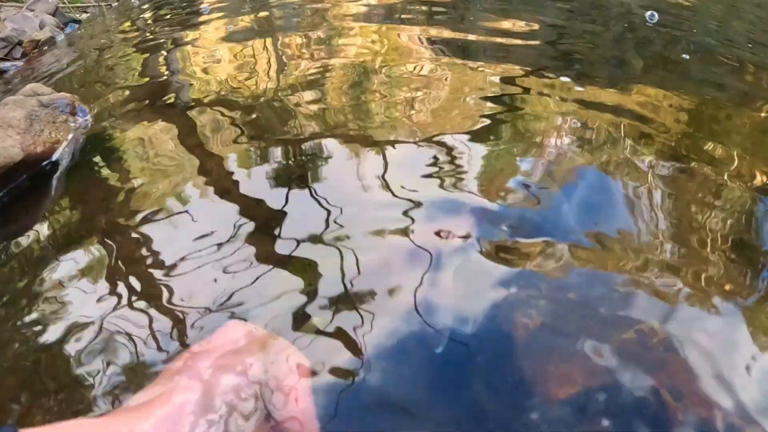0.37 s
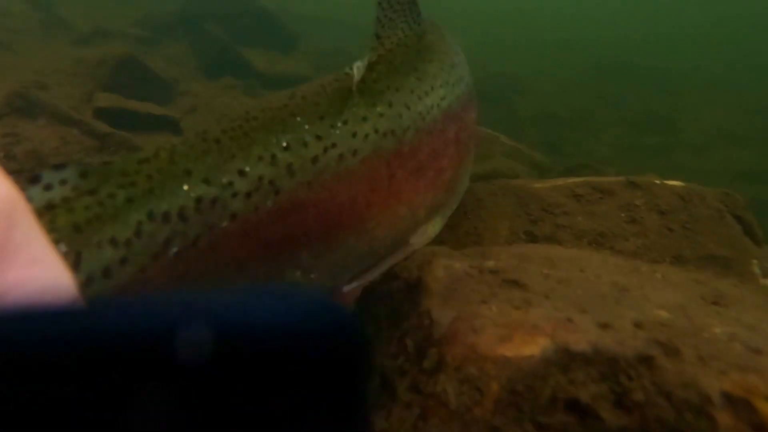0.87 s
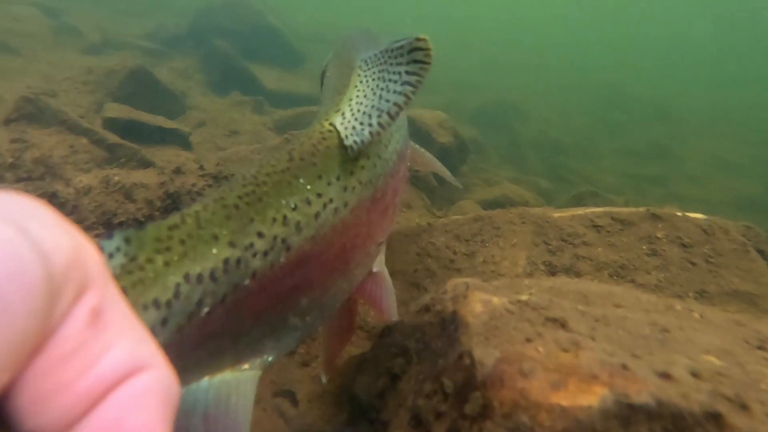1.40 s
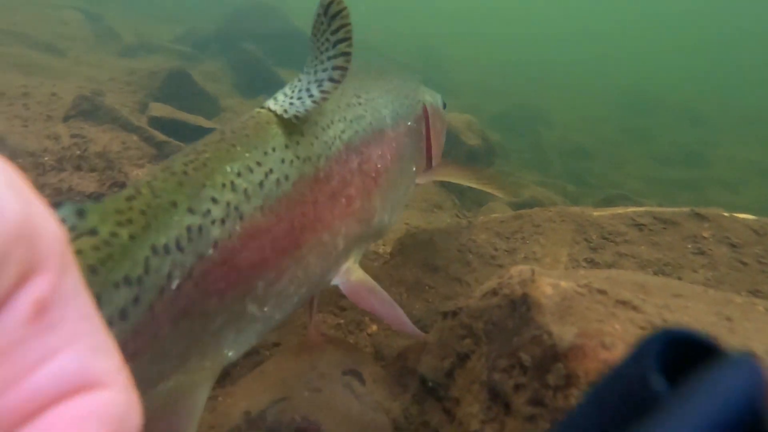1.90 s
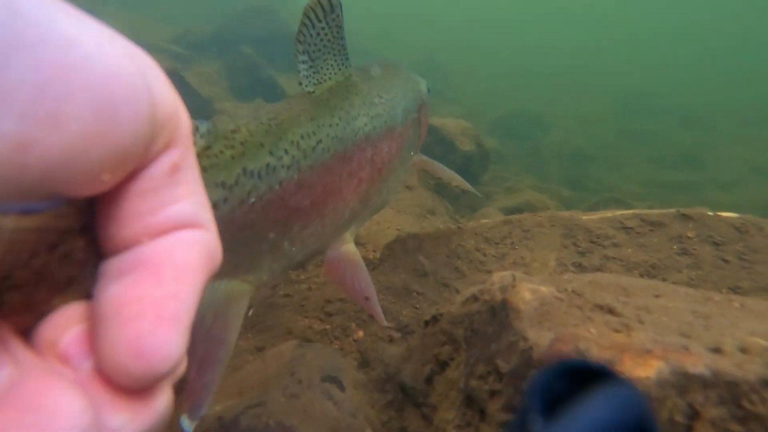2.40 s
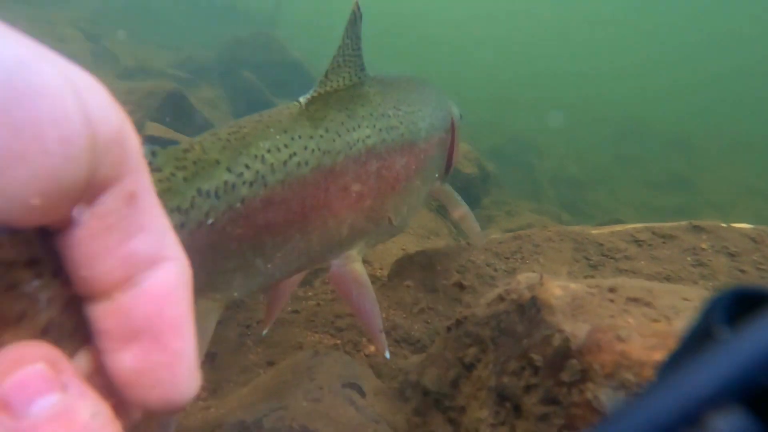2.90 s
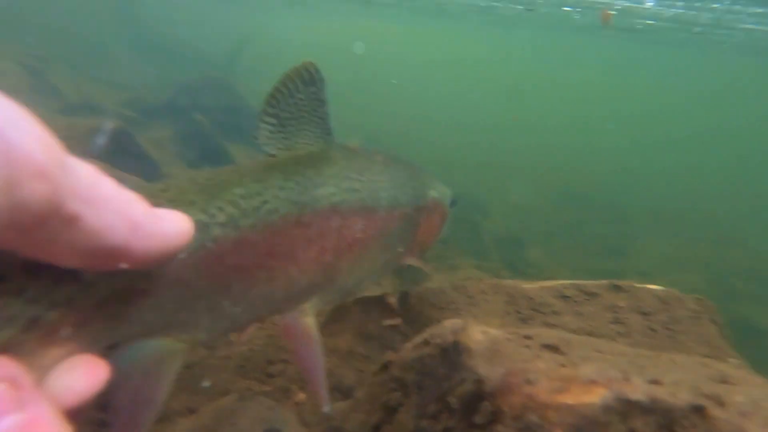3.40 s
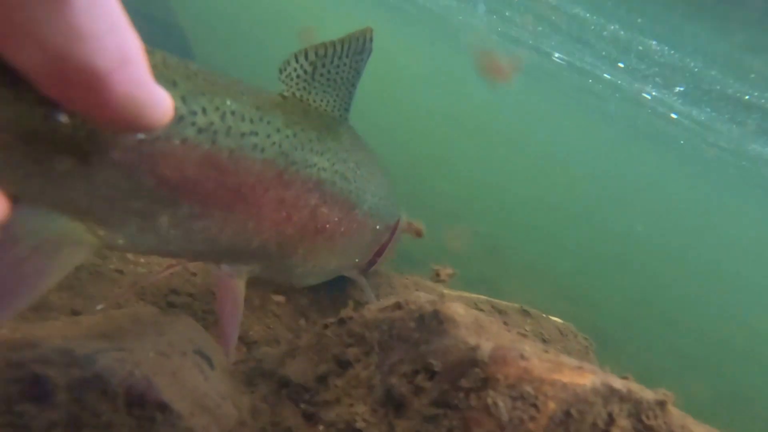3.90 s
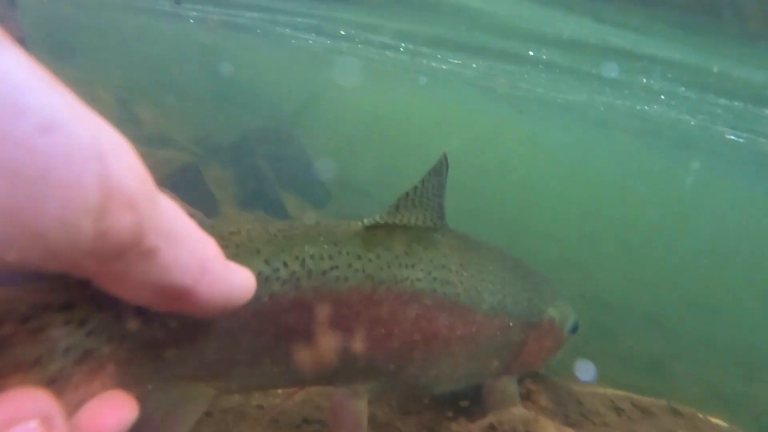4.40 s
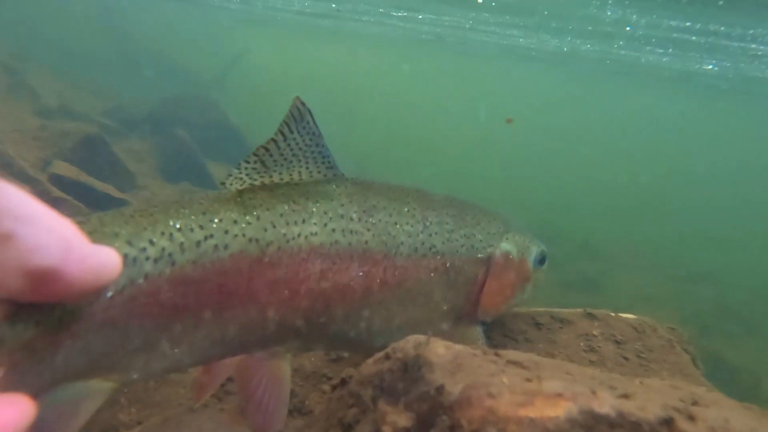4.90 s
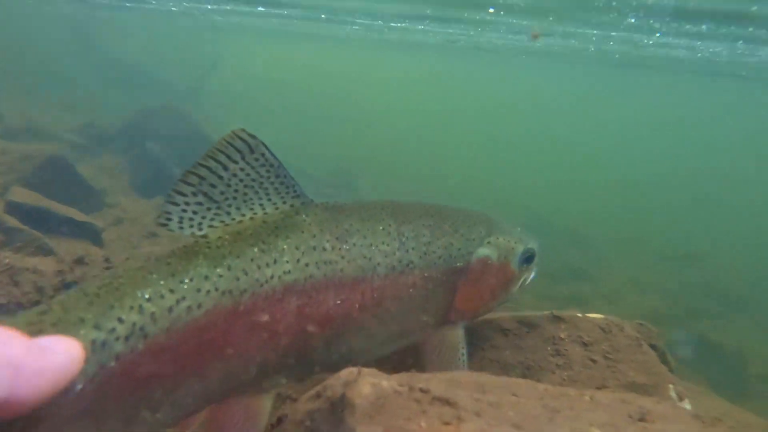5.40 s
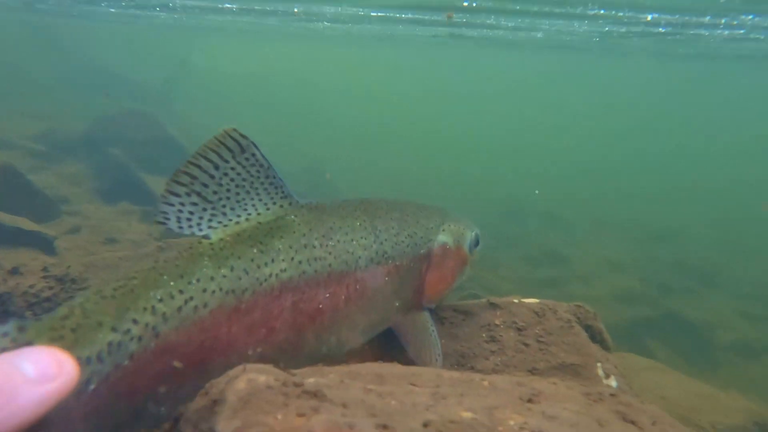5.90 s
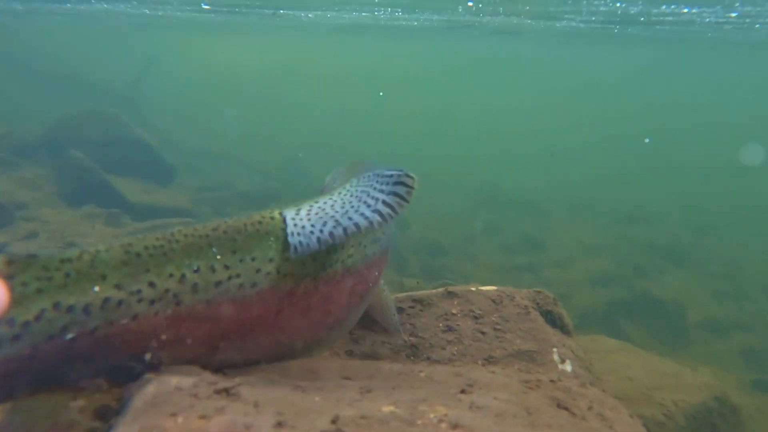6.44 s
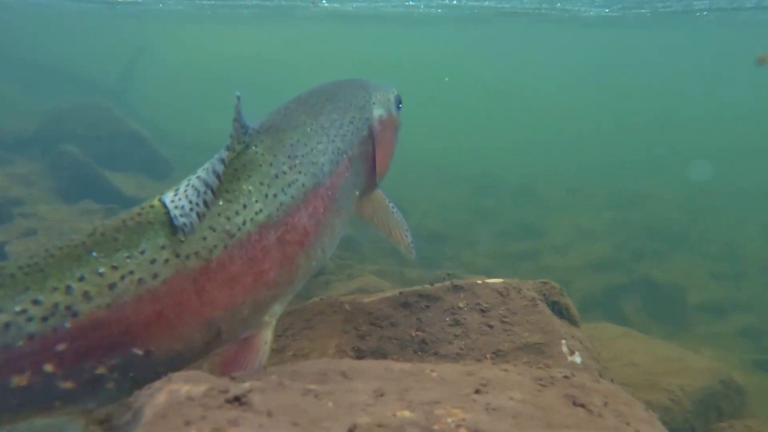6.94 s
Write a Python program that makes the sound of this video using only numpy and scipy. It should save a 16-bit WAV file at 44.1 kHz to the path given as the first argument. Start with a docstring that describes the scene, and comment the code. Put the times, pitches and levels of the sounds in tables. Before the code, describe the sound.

A small microphone dips from a chirping, splashy stream into dull underwater rumble, with gurgling bubbles, then fingers rubbing and knocking its housing.

```python
"""At a stream, a small camera held over the water is pushed under: the bright babble, a noise wash with chirping
bubbles, is cut off. Air pops out of the microphone ports as short dying sines, with slaps of noise and a gurgle.
A muffled rush remains: low noise with the rumble of the current and a resonance of the shell. Fingers rub, scrape
and knock the housing, as noise bursts and struck modes, and pushes thump the diaphragm. The ports hiss faintly.
Soon after the dive the camera folds its two ports into one channel."""
import sys
import numpy as np
from scipy import signal
from scipy.fft import rfft, irfft
from scipy.io import wavfile
from scipy.ndimage import uniform_filter1d

SR = 44100
rng = np.random.default_rng(int(sys.argv[2]) if len(sys.argv) > 2 else 0)


def put_to_file(sound):
    """Save the sound as 16-bit audio at rate SR, in the file named by the first command-line argument."""
    columns = np.atleast_2d(sound).T  # one column per channel
    safe = np.clip(columns, -1, 1)
    whole_steps = np.round(safe * 32767)
    wavfile.write(sys.argv[1], SR, whole_steps.astype(np.int16))


def voltage_ratio(level):
    """Linear amplitude factor for a level in decibels (scalar or array-like)."""
    return 10 ** (np.asarray(level, float) / 20)


N = 311076

DIVE_S = .838  # the ports go under
DIVE_LEAN_DB = -13  # left against right: sounds of the dive are louder at the right port

# ringing modes of the housing: pitch_hz, level_db, t60_s
HOUSING = [(484, 0, .06), (612, -5, .04), (1082, -3, .05), (1448, -20, .05), (1735, -15, .035),
           (2250, -33, .025), (3100, -38, .06), (3610, -36, .035), (4280, -52, .025), (4600, -52, .025)]
# loudness of the muffled rush, with dips and slow swells: time_s, level_db
RUSH_LEVEL = [(.84, -20.5), (.92, -35), (.96, -22), (1.02, -53.5), (1.07, -42.5), (1.12, -43),
              (1.19, -37.5), (1.23, -65), (1.34, -40), (1.5, -41), (1.85, -42.5), (2.06, -36), (2.2, -32.5),
              (2.28, -36.5), (2.48, -33.5), (2.72, -34), (3.05, -29), (3.6, -27), (4.2, -49), (4.4, -21.5),
              (4.53, -50), (4.65, -36.5), (5.08, -36.5), (5.7, -27), (5.9, -27.5), (6.1, -25.5),
              (7.05, -23.5)]
# force of current and grip on the housing, as rumble: time_s, level_db
PUSH_LEVEL = [(.84, -23), (.92, -46.5), (.96, -27), (1.0, -31), (1.19, -22.5), (1.27, -39.5), (1.34, -32.5),
              (1.7, -46), (1.87, -57), (2.03, -30), (2.79, -27), (3.3, -24.5), (3.53, -25.5), (3.58, -30.5),
              (3.85, -15.5), (4.2, -15.5), (4.45, -18.5), (4.54, -30), (4.63, -19.5), (4.92, -28.5),
              (5.0, -25), (5.95, -32.5), (6.03, -23.5), (6.1, -33.5), (6.45, -25), (7.05, -27)]


def amp_of(points, at):
    """Reads (x, dB) rows as a gain."""
    return voltage_ratio(np.interp(at, *np.transpose(points)))


def log_read(points, hz):
    """Reads (Hz, value) rows on a log axis."""
    f, value = np.transpose(points)
    return np.interp(np.log(hz + 1), np.log(f + 1), value)


def evened(x):
    """Scales to rms 1."""
    return x / np.sqrt(np.mean(x ** 2) + 1e-20)


def add(mix, s, sound, pan_db):
    """Lays a sound into both channels; pan_db = left against right."""
    part = mix[:, round(s * SR):][:, :len(sound)]
    part += voltage_ratio(np.array([[pan_db / 2], [-pan_db / 2]])) * sound[:part.shape[1]]


def noise(spectrum, size, patchy_db, flicker_db, tilt_db=0, count=N):
    """Random short-time spectra with drifting patches and a flicker shared by all bands; tilt in dB per octave."""
    hz, frames = np.fft.rfftfreq(size, 1 / SR), 4 * count // size + 5
    a, b, patches = rng.standard_normal((frames, len(hz), 3)).T
    patches = uniform_filter1d(patches, size=size // 128, axis=0)  # smooth along frequency
    patches = evened(uniform_filter1d(patches, size=8, axis=1))  # smooth along time
    flicker = evened(uniform_filter1d(rng.standard_normal(frames), size=4))
    field_db = (log_read(spectrum, hz) + tilt_db * np.log2(hz / 1000 + 0.00085))[:, None]
    z = (a + 1j * b) * voltage_ratio(field_db + patchy_db * patches + flicker_db * flicker)
    return evened(signal.istft(z, nperseg=size, noverlap=3 * size // 4)[1][:count])


def ring(hz, t60, glide=0, rise=4):
    """A dying sine at the pitch hz * (1 + 2 * glide * t); rise = how fast it starts, per cycle."""
    t = np.arange(4000) / SR
    onset = (1 - np.exp(-t * hz * rise)) ** 2
    return np.sin(2 * np.pi * hz * (t + glide * t ** 2)) * voltage_ratio(-60 * t / t60) * onset


def babble(t):
    """Dense wash plus small bubbles that chirp upward; the treble leans left; cut off as the ports go under."""
    # stream heard in air: pitch_hz, density_db (per Hz)
    air_spectrum = [(15, -58), (25, -19), (96, 1.5), (183, 2), (215, 6), (314, -4.5), (583, 4.5), (649, -2),
                    (921, -0.5), (1240, -6), (1340, -6.5), (7520, -29.5), (15600, -50)]
    # what differs between the ports: pitch_hz, density_db (per Hz)
    apart_spectrum = [(24, -41), (40, -3.5), (66, -4), (120, -24.5), (325, -4), (654, -9), (1000, -1.5),
                      (1770, -10), (7540, -22), (15600, -41.5)]
    # share of the sound that leans left: pitch_hz, share
    left_lean = [(1500, 0), (4400, .06), (8000, .17), (14000, .5)]
    level_db, apart_db = -26, -11.5  # apart_db is against the shared part
    count = SR
    mid = noise(air_spectrum, size=1024, patchy_db=1.0, flicker_db=1.5, count=count)
    for hz in np.geomspace(400, 9000, num=24):
        starts = rng.random(count) < 25 / SR  # 25 bubbles per second at each pitch
        sizes = voltage_ratio(4.3 * rng.exponential(1, count)) * starts
        bubbles = signal.oaconvolve(sizes, ring(hz, 12 / hz, glide=hz / 40))[:count]
        mid += voltage_ratio(-14.5 + log_read(air_spectrum, hz) * 0.41) * bubbles
    mid = evened(mid)
    hz = np.fft.rfftfreq(count, 1 / SR)
    apart = noise(apart_spectrum, size=1024, patchy_db=-0.1, flicker_db=0.0, count=count)
    side = irfft(voltage_ratio(apart_db) * rfft(apart) + log_read(left_lean, hz) * rfft(mid), count)
    pair = np.zeros((2, N))
    pair[:, :count] = mid + np.array([[1], [-1]]) * side
    return pair * voltage_ratio(level_db) * np.clip((DIVE_S - t) / 0.0015, 0, 1)


def under_water(mid, apart, t):
    """Spreads a sound over the submerged ports, stronger at the right one, from the dive on."""
    side = 0.89 * apart - 0.35 * mid
    return np.array([mid + side, mid - side]) * np.clip((t - DIVE_S) / 0.00075, 0, 1)


def muffled_rush(t):
    """The stream through water and housing: low noise with separate grain at each port."""
    # stream heard through water and housing: pitch_hz, density_db (per Hz)
    rush_spectrum = [(53, -48), (90, -8.5), (150, -7.5), (185, -7.5), (283, 0), (357, -17), (426, -3),
                     (600, 0), (710, 0), (765, -12.5), (941, -11.5), (1070, -20.5), (1190, -19.5),
                     (1670, -36.5), (2270, -60), (3000, -66), (3900, -100), (6600, -120)]
    gain = amp_of(RUSH_LEVEL, t)
    mid, apart = [gain * noise(rush_spectrum, size=1024, patchy_db=.9, flicker_db=1.5) for _ in range(2)]
    return under_water(mid, apart, t)


def rumble(t):
    """Current and grip push the housing: lumpy low noise, nearly the same at both ports."""
    # current and grip pushing the housing: pitch_hz, density_db (per Hz)
    rumble_spectrum = [(8.8, -25), (15, 9.5), (51, -5), (123, -18.5), (162, -18.5), (198, -26), (300, -22),
                       (390, -47), (660, -120)]
    gain = amp_of(PUSH_LEVEL, t)
    mid, apart = [gain * noise(rumble_spectrum, size=4096, patchy_db=3.5, flicker_db=1.0) for _ in range(2)]
    return under_water(mid, 0.3 * apart, t)


def shell_ring(t):
    """Rush and push levels set a noise-driven resonance of the shell, with wandering pitch and wavering level."""
    # the grip damps or frees the ring, and a firmer grip lowers it: time_s, pitch_hz, level_db
    at, shell_hz, shell_db = np.transpose([(1.998, 637, 4.5), (2.719, 674, -12.5), (2.78, 651, 2.5),
                                           (3.448, 688.5, 5.5), (3.6, 613, 9), (3.898, 617, -3.5),
                                           (3.98, 579, 4.5), (4.052, 601, 1), (4.151, 594, 8.5),
                                           (4.22, 589, -8), (4.4, 577, 1.5), (4.701, 635, -2.5),
                                           (5.199, 655, -1), (5.8, 671, -2.5), (6.399, 644, -3),
                                           (7.05, 702.6, -0.5)])
    from_rush_db, from_push_db = -15.5, -11
    waver_db, waver_s = 3.5, 0.11
    pole_width_hz = 80
    turn = np.exp(2j * np.pi * np.cumsum(np.interp(t, at, shell_hz)) / SR)
    r = np.exp(-np.pi * pole_width_hz / SR)
    waver = evened(signal.oaconvolve(rng.standard_normal(N), np.hanning(round(waver_s * SR)), "same"))
    rush_part = voltage_ratio(from_rush_db) * amp_of(RUSH_LEVEL, t)
    push_part = voltage_ratio(from_push_db) * amp_of(PUSH_LEVEL, t)
    gain = np.hypot(rush_part, push_part) * voltage_ratio(np.interp(t, at, shell_db) + waver_db * waver)
    gain = gain * np.interp(t, (1.4, 2.2), (0, 1))  # seconds: it wakes as the air leaves the ports
    layers = []
    for _ in range(2):
        # two poles at zero frequency, then shifted up to the moving pitch
        drive = signal.lfilter([1], [1, -r], rng.standard_normal(N) / turn)
        layers.append(gain * evened((turn * signal.lfilter([1], [1, -r], drive)).real))
    return under_water(*layers, t)


def pops():
    """Each trapped bubble leaving the ports rings briefly and unevenly at its own pitch."""
    # air pops: start_s, level_db (peak before wobble and lean), pitch_hz, t60_s, glide (as in ring, per s)
    air_pops = [(.821, -17, 900, .02, 0), (.8275, -12, 900, .03, 0), (.8355, -8, 900, .007, 0),
                (.855, -33, 1650, .04, 0), (.857, -28, 1150, .03, 0), (.8635, -13, 450, .008, 0),
                (.8695, -21, 1250, .022, 0), (.870, -16, 750, .018, 0), (.871, -43, 2200, .015, 0),
                (.869, -53, 3500, .03, 0), (.8868, -10, 580, .011, 0), (.887, -27, 1200, .012, 0),
                (.904, -26, 800, .025, 0), (.912, -46, 2250, .012, 0), (.911, -15, 700, .015, 0),
                (.9175, -20, 480, .025, 0), (.928, -17, 1150, .016, 0), (.9285, -36, 1600, .05, 0),
                (.9305, -21, 600, .022, 0), (.944, -19, 650, .03, 0), (.9618, -7, 650, .013, 0),
                (.969, -17, 750, .022, 0), (1.0045, -20, 1150, .028, -6), (1.006, -46, 2050, .02, 0),
                (1.043, -33, 400, .03, 0), (1.06, -33, 700, .04, 0), (1.061, -46, 1250, .03, 0),
                (1.138, -43, 1100, .015, 0), (1.2, -32, 700, .03, 0), (1.213, -13, 600, .03, 0),
                (1.383, -46, 1350, .03, 0), (1.535, -38, 620, .04, 0), (1.662, -41, 600, .03, 0),
                (1.697, -37, 820, .035, 0), (1.698, -43, 1200, .03, 0), (4.905, -42, 1600, .05, 0),
                (5.785, -18, 650, .06, 0), (6.258, -31, 1050, .03, 5), (6.377, -16, 540, .06, 0),
                (6.392, -18, 560, .04, 0), (6.393, -62, 3600, .012, 0)]
    out = np.zeros((2, N))
    for s, db, hz, t60, glide in air_pops:
        smoothing = signal.windows.blackmanharris(120)
        wobble = 1 + .25 * evened(np.convolve(rng.standard_normal(4000), smoothing, "same"))
        pop = ring(hz, t60, glide, rise=1.0)
        add(out, s, voltage_ratio(db) * pop / abs(pop).max() * wobble, DIVE_LEAN_DB)
    return out


def slaps():
    """Water slaps the ports: short dense noise bursts that die away."""
    # slaps: start_s, level_db (before decay and lean), t60_s, brightness_db (per octave)
    port_slaps = [(.8362, -9, .005, 4), (.8485, -25, .003, 7), (.872, -30, .015, -3), (.895, -40, .01, 1),
                  (.949, -34, .015, 0), (.9625, -11, .02, 1), (1.2125, -13, .018, -.5)]
    # colour of a slap: pitch_hz, density_db (per Hz)
    slap_spectrum = [(200, -24), (400, -10), (713, 0), (1250, -14), (1630, -14), (2090, -24), (3810, -31),
                     (14000, -78)]
    out, t = np.zeros((2, N)), np.arange(4000) / SR
    for s, db, t60, tilt_db in port_slaps:
        burst = noise(slap_spectrum, size=512, patchy_db=0, flicker_db=0, tilt_db=tilt_db, count=4000)
        add(out, s, voltage_ratio(db - 60 * t / t60) * burst * np.clip(t / .0008, 0, 1), DIVE_LEAN_DB)
    return out


def gurgle(t):
    """Small bubbles stream from the ports at random instants on ten pitches, fading after the dive."""
    per_s, level_db, t60_s = 160, -29, 0.27  # level at 700 Hz for a middling bubble
    out, fading = np.zeros((2, N)), voltage_ratio(level_db - 60 * (t[:SR] / t60_s))
    for hz in np.geomspace(500, 2200, num=10):
        starts = rng.random(SR) < per_s / 10 / SR
        sizes = voltage_ratio(4.7 * rng.standard_normal(SR)) * starts
        bubble = ring(hz, 9 / hz, rise=1) * 700 / hz
        add(out, DIVE_S, signal.oaconvolve(sizes * fading, bubble), DIVE_LEAN_DB)
    return out


def drips():
    """Drops tick on the housing just before the dive: dying sines a few cycles long."""
    # drops: start_s, peak_db (before pan), pitch_hz, t60_cycles, pan_db (left against right)
    drops = [(.5795, -41, 11500, 5, 4), (.6618, -21, 3300, 8, 1), (.7042, -22, 5000, 4, 0),
             (.7272, -26, 5900, 8, 1), (.7478, -26, 5500, 3, 3), (.7598, -28, 4200, 5, 3),
             (.811, -38, 13400, 10, 5), (.8238, -16, 3200, 34, 0), (.8265, -32, 10200, 20, 4)]
    out = np.zeros((2, N))
    for s, db, hz, cycles, pan_db in drops:
        drip = ring(hz, cycles / hz, rise=0.88)
        add(out, s, voltage_ratio(db) * drip / abs(drip).max(), pan_db)
    return out


def rubs():
    """Skin sticks and slips on the housing: juddering noise swells, fades and picks up the damped modes."""
    # skin sliding on the housing: pitch_hz, density_db (per Hz)
    skin_spectrum = [(59, -29), (100, 15), (174, 1.5), (393, -4.5), (624, 5.5), (786, -14), (991, -9.5),
                     (1410, -25.5), (1570, -23), (2280, -38.5), (2780, -45.5), (3700, -55.5), (4400, -65.5),
                     (7000, -80.5), (9100, -107), (15400, -120)]
    # rubs: middle_s, level_db (nominal), length_s, brightness_db (per octave)
    strokes = [(1.385, -41, .03, -1), (1.72, -47, .07, 1), (1.92, -50, .14, 2), (1.975, -51, .04, 2),
               (2.12, -49, .05, 2), (2.17, -43, .05, -1), (2.263, -47, .01, 4), (2.556, -46, .01, 3),
               (3.12, -26, .04, -2), (3.21, -35, .05, -1), (3.35, -33, .04, 0), (3.518, -22, .035, 0),
               (3.57, -36, .08, 3), (3.63, -34, .05, 0), (3.7, -34, .07, 2), (3.835, -28, .05, 2),
               (3.92, -28, .07, 2), (3.96, -23, .065, 3), (4.04, -34, .07, 1), (4.1, -25, .07, 1.5),
               (4.2, -29, .06, 2), (4.255, -30, .07, 2), (4.318, -22, .045, 2.5), (4.47, -36, .06, 1),
               (4.535, -40, .09, 2), (4.6, -34, .07, 0), (4.68, -27, .06, -1.5), (4.73, -36, .08, 0),
               (4.8, -28, .045, -1.5), (4.885, -26, .05, -2), (4.93, -38, .09, 0)]
    fall_db = 24  # fade over one rub length from its middle
    judder_db, judder_s = 3, .004
    lift_db, t60_share = -3, .3  # lift at the housing modes; share of their t60 left under the skin
    out, shell = np.zeros((2, N)), 0
    for hz, _, t60 in HOUSING:
        damped = t60 * t60_share
        # scaled so that every mode lifts its own pitch alike
        shell = shell + voltage_ratio(lift_db) * 2 * np.log(1000) / (damped * SR) * ring(hz, damped)
    for s, db, length, tilt_db in strokes:
        u = np.arange(-3 * length, 3 * length, 1 / SR)[:SR] / length  # time in rub lengths
        grit = noise(skin_spectrum, size=512, patchy_db=2.5, flicker_db=1.2, tilt_db=tilt_db, count=SR)[:len(u)]
        judder = np.convolve(rng.standard_normal(SR), np.hanning(round(judder_s * SR)), "same")[:len(u)]
        grit = grit * voltage_ratio(judder_db * evened(judder) - 1)
        grit = evened(grit + signal.oaconvolve(grit, shell)[:len(u)])
        swell = voltage_ratio(db - fall_db * (np.hypot(u, .3) - 0.5014)) * np.hanning(len(u)) ** .5
        add(out, s - 3 * length, swell * grit, 0)
    return out


def scrape():
    """A nail catches on the housing: a dense run of random slips rings its modes."""
    start_s, end_s, level_db = 4.378, 4.408, -18
    bright_db = 2.5  # per octave: quick slips favour the upper modes
    out, count = np.zeros((2, N)), round((end_s - start_s) * SR)
    slips = rng.standard_normal(4000)[:count] * (rng.random(4000)[:count] < 2500 / SR)  # 2500 per second
    slips = slips * signal.windows.tukey(count, .4)
    modes = sum(voltage_ratio(d + bright_db * np.log2(hz / 500)) * ring(hz, t60, rise=0.99) for hz, d, t60 in HOUSING)
    rung = np.convolve(slips, modes)
    add(out, start_s, voltage_ratio(level_db) * rung / np.std(rung[:count]), 0)
    return out


def knocks():
    """A knock sets off all housing modes, unevenly each time, with a short noisy crack."""
    # knocks on the housing: start_s, body_peak_db, crack_db (against the body peak)
    blows = [(3.0675, -28, -13), (3.081, -44, -12), (4.367, -21, -25), (4.376, -22, -20), (4.407, -11, -5),
             (4.416, -10, -45)]
    # colour of the crack: pitch_hz, density_db (per Hz)
    crack_spectrum = [(300, -42.5), (1900, 4), (3700, -14), (5000, -24), (9000, -44), (15000, -68)]
    out, t = np.zeros((2, N)), np.arange(4000) / SR
    for s, db, crack_db in blows:
        body = sum(voltage_ratio(d + 2 * rng.standard_normal()) * ring(hz, t60, rise=1) for hz, d, t60 in HOUSING)
        crack = noise(crack_spectrum, size=512, patchy_db=0, flicker_db=0, count=4000)
        crack = crack * voltage_ratio(-60 * t / .012) * np.clip(t / 0.00021, 0, 1)
        add(out, s, voltage_ratio(db) * (body / abs(body).max() + voltage_ratio(crack_db) * crack), 0)
    return out


def pushes():
    """Dull pushes bend the diaphragm to and fro for one and a half cycles."""
    # pushes: start_s, peak_db (before lean), pitch_hz, direction (of the main swing, +1 or -1)
    thumps = [(.819, -14, 170, 1), (.828, -18, 152, 1), (.8405, -12, 60, -1), (.9615, -9, 125, 1),
              (1.152, -16, 214, 1), (1.181, -15, 98, 1), (1.2133, -6, 244, -1), (1.619, -28, 193, 1),
              (1.656, -25, 145, 1), (3.111, -19, 347, -1), (3.116, -8, 300, -1), (3.274, -14, 36, 1),
              (3.344, -13, 34, 1), (3.515, -8, 42, 1), (3.761, -15, 55, 1), (3.853, -11, 62, -1),
              (4.028, -15, 130, 1), (4.1358, -4, 360, -1), (4.175, -11, 75, -1), (4.283, -13, 80, -1),
              (4.3305, -5, 230, -1), (4.4068, -5, 260, -1), (4.449, -12, 45, 1), (4.646, -18, 159, -1),
              (4.781, -17, 258, 1), (4.805, -16, 50, -1), (4.902, -17, 32, 1)]
    out = np.zeros((2, N))
    for s, db, hz, way in thumps:
        turns = np.arange(0, 1.5, hz / SR)
        swing = np.sin(2 * np.pi * turns) * np.hanning(len(turns)) ** 0.59
        lean_db = DIVE_LEAN_DB * (s < .9)  # only the first pushes lean right
        add(out, s, -way * voltage_ratio(db) * swing, lean_db)
    return out


def port_hiss(t):
    """Self-noise of the ports: two independent hisses."""
    # colour of the self-noise: pitch_hz, density_db (per Hz)
    hiss_spectrum = [(880, -25.5), (1500, -0.5), (1770, -14.5), (2130, -3.5), (2310, 5), (5150, -3.5),
                     (8480, -12), (15600, -34)]
    # hiss ahead of the stereo matrix: time_s, level_db
    hiss_level = [(1.345, -57.5), (1.355, -64), (1.8, -59.5)]
    gain = amp_of(hiss_level, t)
    return [noise(hiss_spectrum, size=512, patchy_db=.5, flicker_db=0) * gain for _ in range(2)]


def scene():
    """All sources at the two ports."""
    t = np.arange(N) / SR
    stream = babble(t) + muffled_rush(t) + rumble(t) + shell_ring(t)
    air_and_drops = pops() + slaps() + gurgle(t) + drips()
    handling = rubs() + scrape() + knocks() + pushes()
    return stream + air_and_drops + handling


def low_pass(x):
    """Removes everything above the highest recorded frequency."""
    return signal.sosfilt(signal.butter(12, 15700, fs=SR, output="sos"), x)


def record(dry):
    """The stereo matrix adds port hiss, mostly to the side, and folds to mono; then a hard ceiling."""
    # stereo folding to mono: time_s, side_db
    stereo_width = [(.8, -5), (.83, -0.5), (1.0, -2.5), (1.35, -3), (1.45, -10), (1.8, -23.5), (2.3, -57),
                    (2.5, -83.5)]
    t = np.arange(N) / SR
    width = amp_of(stereo_width, t)
    mid_hiss, side_hiss = port_hiss(t)
    floor = voltage_ratio(-100.5) * rng.standard_normal(N)
    mid = dry.mean(0) + voltage_ratio(-11.5) * width ** .5 * mid_hiss + floor
    side = ((dry[0] - dry[1]) / 2 + side_hiss) * width
    mix = np.clip([mid + side, mid - side], -1, 1)
    return low_pass(mix)


dry = scene()
out = record(dry)
put_to_file(out)
```